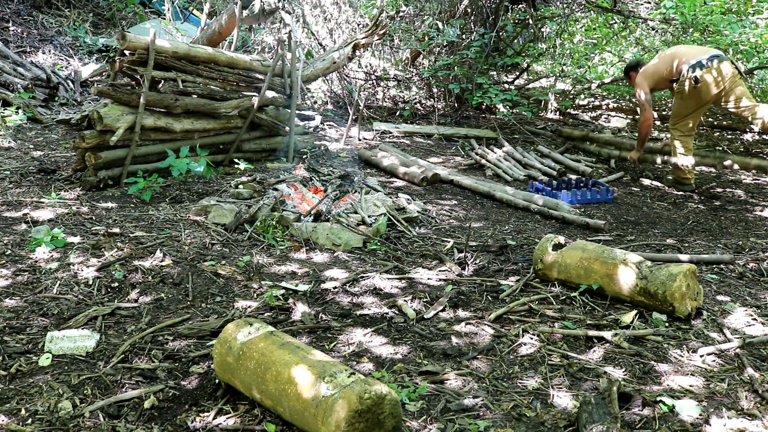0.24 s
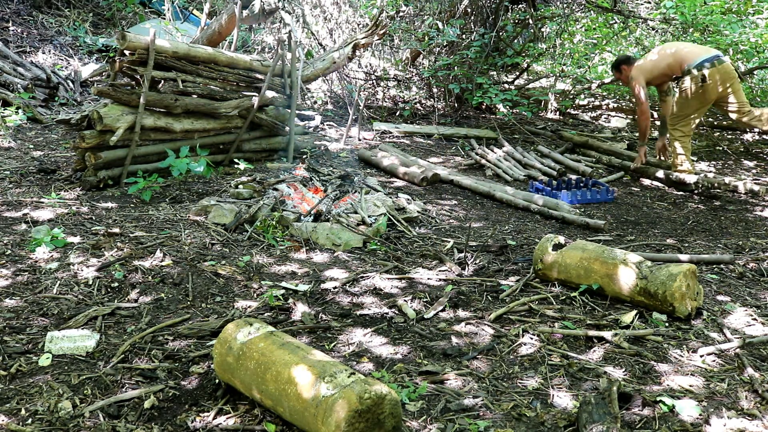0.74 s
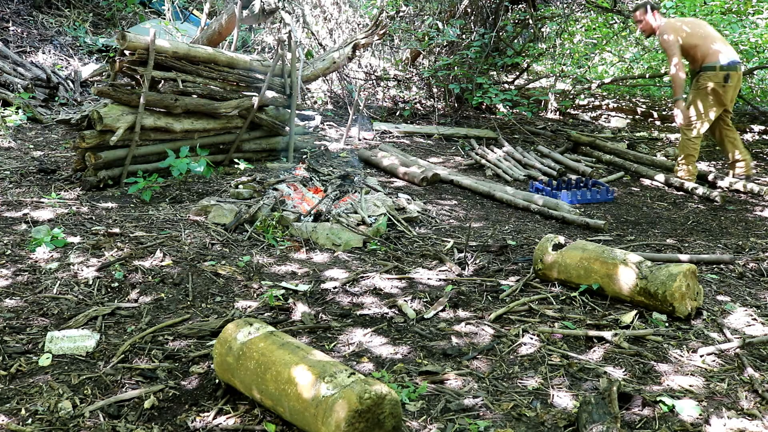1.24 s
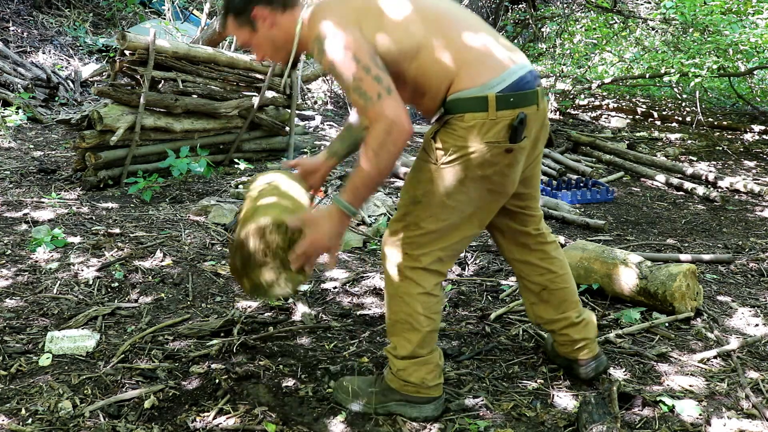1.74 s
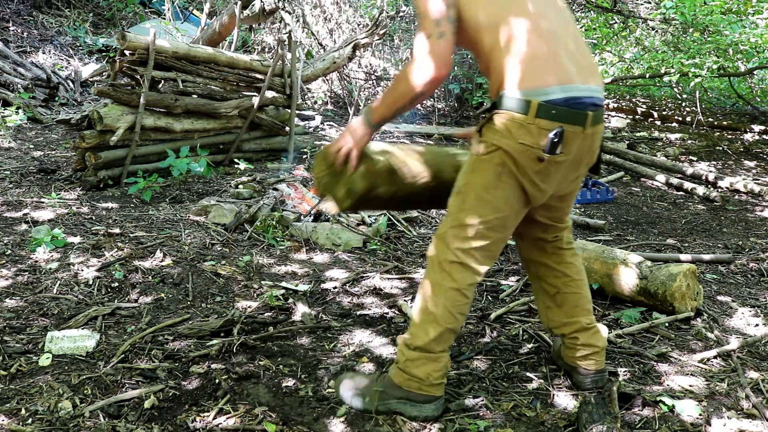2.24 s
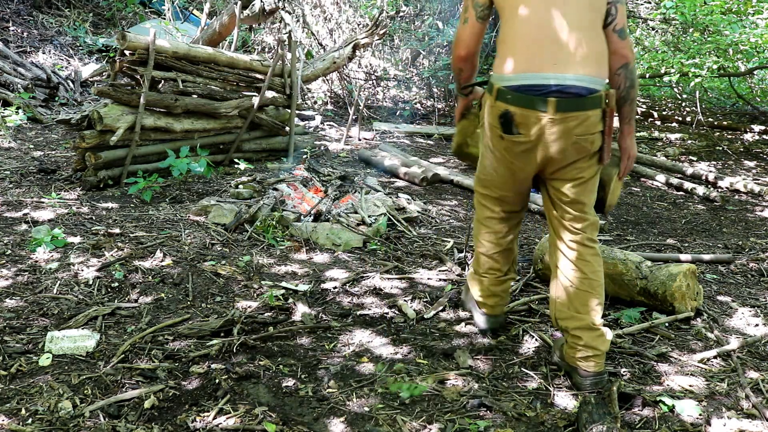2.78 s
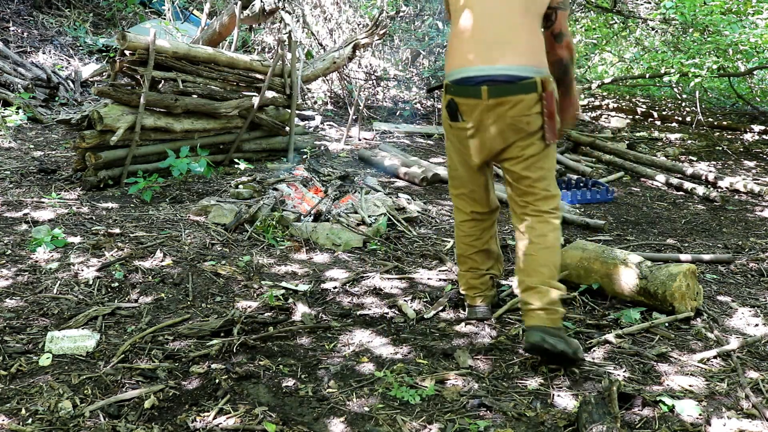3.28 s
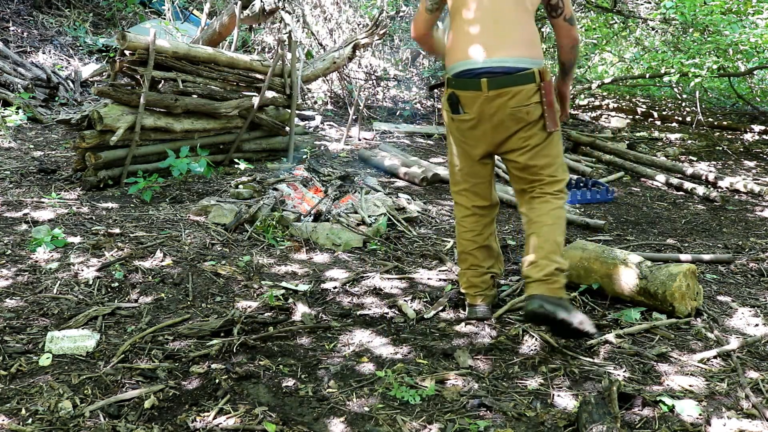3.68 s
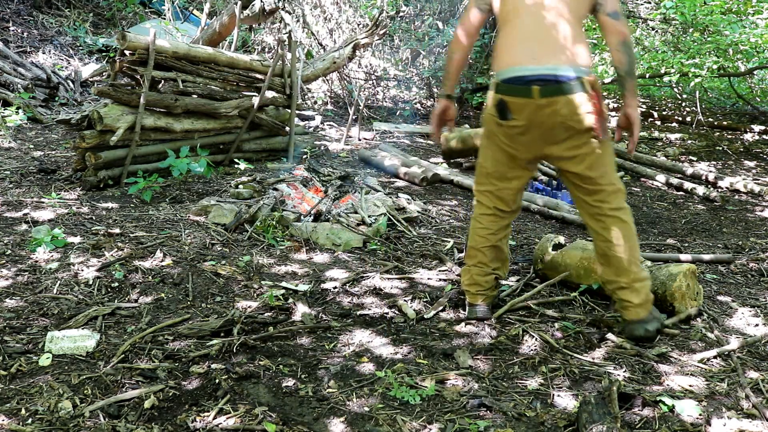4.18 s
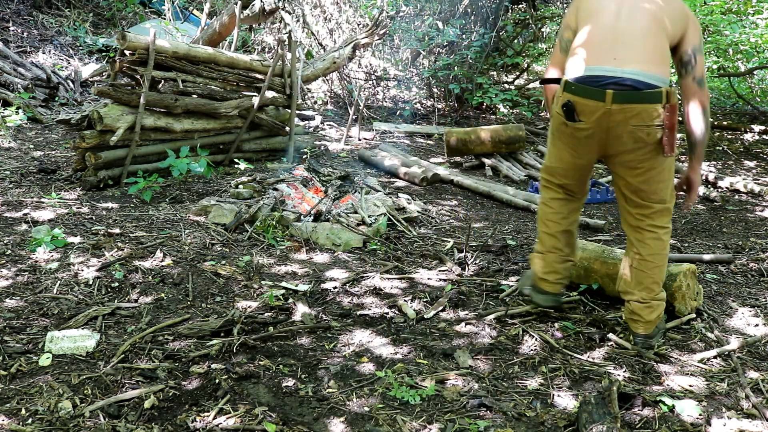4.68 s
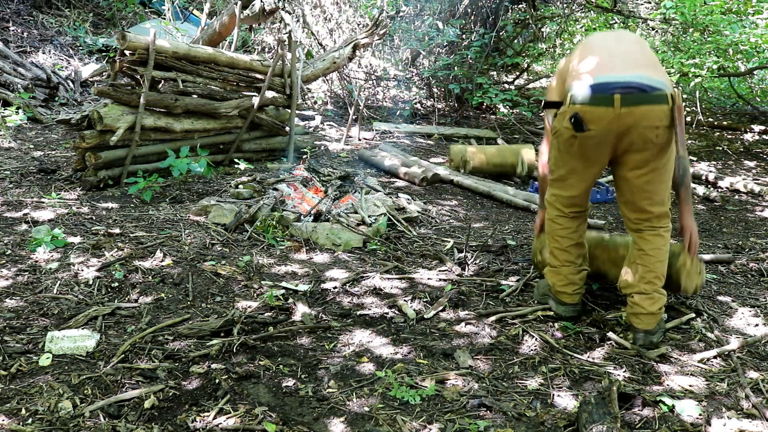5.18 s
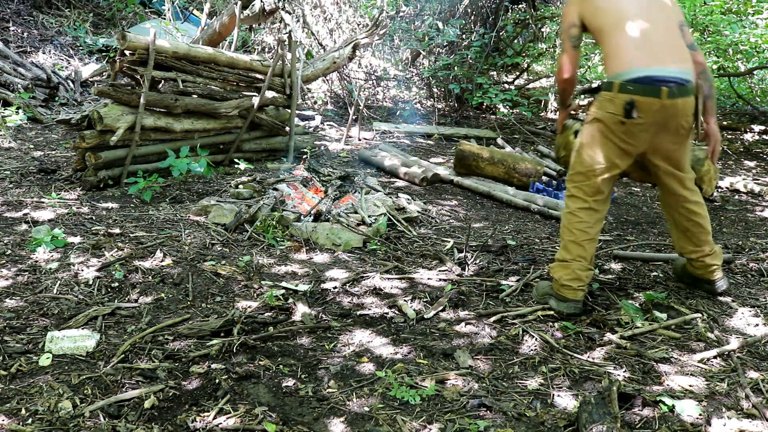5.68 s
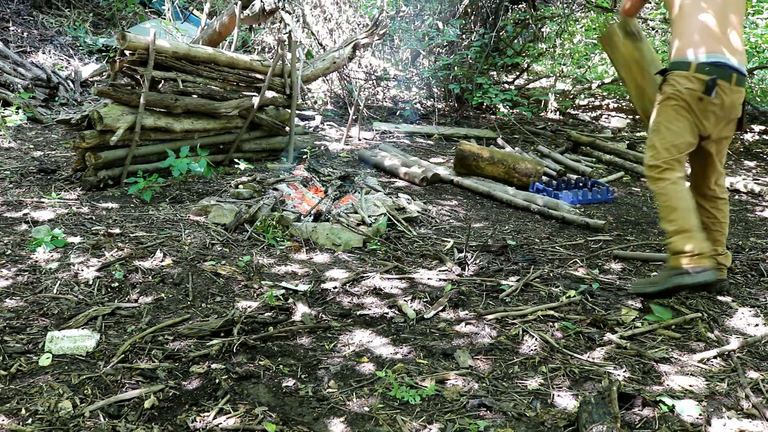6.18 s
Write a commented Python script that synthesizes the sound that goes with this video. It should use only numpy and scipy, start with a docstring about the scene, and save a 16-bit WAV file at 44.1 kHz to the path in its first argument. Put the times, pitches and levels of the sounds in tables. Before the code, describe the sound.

Insects drone in a forest while a pole and then a short log knock down among footsteps and cracking twigs.

```python
"""Summer woodland: two insect choruses hiss throughout, over far traffic, leaves and engine hum.
First, boots scuff the leaf litter, thud on soil and snap twigs. At 1.35 s a pole drops on a wood stack
and rings with hard knocks. More steps follow, then at 4 s a short log lands, rocks and settles as
twigs crack. The recorder turns its gain down briefly after each loud knock. Last, the boots tread on."""
import sys
import numpy as np
from scipy import signal
from scipy.fft import rfft, irfft
from scipy.io import wavfile
from scipy.ndimage import minimum_filter1d

SR = 44100
rng = np.random.default_rng(int(sys.argv[2]) if len(sys.argv) > 2 else 0)


def file_out(sig):
    """Save sig as 16-bit WAV at sys.argv[1]."""
    # one column per channel
    cols = np.atleast_2d(sig).T
    # limit, then scale
    lim = np.clip(cols, -1, 1)
    pcm = np.round(lim * 32767).astype(np.int16)
    wavfile.write(sys.argv[1], SR, pcm)


N = 283512


def knocks(blows, tones, gain_db, bark_db):
    """Each blow rings the wood's own tones and crushes some bark; a soft contact sounds duller."""
    out, t = np.zeros(N), np.arange(SR // 2) / SR
    for start, blow_db, hardness_hz in blows:
        for k, (hz, tone_db, ring_s) in enumerate(tones):
            strength = (-1) ** k / (1 + (hz / hardness_hz) ** 2)   # neighbours swing opposite ways
            fade = from_db(blow_db + tone_db + gain_db - 60 * t / ring_s)
            add(out, start, fade * strength * np.sin(2 * np.pi * hz * t))
        crush = rms_one(band(rng.standard_normal(len(t)), hardness_hz, octaves=2.9))
        add(out, start, from_db(blow_db + bark_db - 60 * t / 0.038) * crush)
    bass_cut = signal.butter(2, 90, "high", fs=SR, output="sos")   # small bodies give no deep bass
    return signal.sosfilt(bass_cut, out)


# Each row: start in seconds, level in dB, hardness of the hit in Hz (higher is brighter).
POLE_BLOWS = [(1.348, -17, 4000), (1.3519, 2.5, 500), (1.3556, 4.5, 1500), (1.3595, -8, 2960),
              (1.363, -6, 1795), (1.369, -25, 800), (1.414, -31, 3000), (1.436, -25, 2500)]
# Each row: pitch of a ringing tone in Hz, level in dB, seconds to fade by 60 dB.
POLE_TONES = [(105, -14.5, 0.054), (165, -13.5, 0.091), (244, -13, 0.024), (366, -5.5, 0.031),
              (494, -0.5, 0.02), (697, -5.5, 0.023), (920, -9, 0.018), (1490, -8.5, .025),
              (1920, -9.5, 0.024), (2370, -7, 0.011), (3060, -10, .012), (4170, -8, .01)]

def pole():
    """A pole lands on the stack and bounces, ringing very briefly."""
    return knocks(POLE_BLOWS, POLE_TONES, gain_db=-2, bark_db=-22)


# Each row: start in seconds, level in dB, hardness of the hit in Hz.
LOG_BLOWS = [(4.020, -17, 4000), (4.023, -10, 700), (4.029, -17, 400), (4.033, -6, 2500), (4.0349, 7, 550),
             (4.038, -7.5, 2500), (4.0412, -7, 700), (4.047, -9, 1500), (4.134, -21, 1500),
             (4.206, -13, 500)]
# Each row: pitch of a ringing tone in Hz, level in dB, seconds to fade by 60 dB.
LOG_TONES = [(172, -8, 0.024), (255.6, -12.5, 0.35), (298, 2.5, 0.02), (463, -15, 0.21), (518, -10.5, 0.18),
             (644, -3.5, 0.024), (762, -7, 0.095), (910, -3, 0.048), (1160, -6.5, 0.12), (1540, -3, 0.026),
             (1900, -6, 0.052), (2370, -7, 0.027), (3250, -7, .015)]

def short_log():
    """A log lands, rocks and settles; a few of its tones ring on."""
    return knocks(LOG_BLOWS, LOG_TONES, gain_db=-5, bark_db=-19)


# Each row: start in seconds, level in dB, middle pitch in Hz, width in octaves.
TWIG_SNAPS = [(0.392, -16.5, 2000, 1.7), (.411, -20.5, 1400, 1.3), (2.274, -18.5, 3220, 1.1),
              (2.397, -15.5, 2020, 3), (2.435, -15, 2220, 3.2), (2.919, -33, 1590, 1.1),
              (3.414, -18.5, 1100, 3.1), (4.181, -18, 3600, 1.5), (4.185, -9, 2590, 4.6),
              (4.206, -20, 1700, 2.2), (4.234, -14, 1600, 2), (4.245, -17, 1500, 2.9),
              (4.259, -17, 3500, 2.3), (4.294, -20, 1860, 1.7), (4.3065, -5, 2800, 1.44),
              (4.321, -10.5, 1700, 1.6), (4.335, -25, 2100, 1.1), (4.355, -18, 1800, 1.1),
              (5.095, -30, 1450, 2.1), (5.142, -24.5, 2400, 1.2)]

def twigs():
    """Twigs break with bright, very short cracks, towards the right."""
    out = np.zeros((2, N))
    for start, level_db, hz, octaves in TWIG_SNAPS:
        add(out, start, burst(level_db, hz, octaves, fade_s=0.016, lean_db=-6.5, spread=0.85))
    return out


# Each row: start in seconds, level in dB, middle pitch in Hz, seconds to fade by 60 dB.
SOIL_THUDS = [(.357, -23.5, 637, 0.054), (.397, -27, 300, 0.052), (.40, -26.5, 85, 0.1),
              (0.463, -32, 267, 0.064), (1.418, -13, 900, 0.019), (1.422, -10, 970, 0.049),
              (2.396, -21.5, 393, 0.035), (2.532, -33, 261, .05), (2.916, -31.5, 300, .04),
              (4.362, -20, 394, 0.074), (4.805, -35, 304, 0.046), (4.855, -27.5, 292, .035),
              (5.047, -21, 338, 0.063), (5.106, -23.5, 846, .075), (5.232, -26.5, 700, .045),
              (5.252, -25.5, 277, 0.044), (5.274, -35, 210, 0.045), (5.372, -26, 260, 0.096),
              (5.779, -26, 263, .05), (6.26, -34, 296, .07)]

def thuds():
    """Boots and wood hit the soil with dull puffs of noise."""
    out = np.zeros((2, N))
    for start, level_db, hz, fade_s in SOIL_THUDS:
        add(out, start, burst(level_db, hz, octaves=1.5, fade_s=fade_s, lean_db=0.7, spread=0.041))
    return out


# Each row: start in seconds, length in seconds, level in dB, middle pitch in Hz, width in octaves.
SCUFF_STROKES = [(.345, 0.12, -42.5, 1290, 3.6), (1.367, 0.078, -29.5, 1020, 3.1),
                 (1.5, 1.1, -54, 1500, 3.7), (2.082, 0.028, -41.5, 1400, 2.5),
                 (1.698, .095, -40.5, 1900, 1.8), (1.706, 0.083, -37.5, 760, .8),
                 (1.808, 0.034, -42.5, 1200, 2.5), (1.873, 0.088, -47.5, 835, 0.46),
                 (1.881, 0.099, -46, 1800, 1.9), (2.396, 0.23, -49.5, 890, 2.8),
                 (3.276, 0.071, -43.5, 875, 1.8), (3.337, 0.07, -47, 504, 0.51),
                 (3.41, 0.061, -47.5, 1580, 1.8), (4.046, 0.24, -33.5, 1140, 2.8),
                 (4.301, 0.051, -29.5, 2370, 1.8), (5.051, 0.12, -38.5, 1500, 4.4),
                 (5.225, 0.032, -39, 1900, 3.6), (5.37, 0.027, -42.5, 1500, 2.2),
                 (5.37, 0.36, -48, 1400, 3.2), (6.175, 0.079, -48, 2300, 1.9),
                 (6.2, 0.035, -36.5, 2200, 3.7), (5.219, 0.27, -50.5, 446, 2), (6.255, 0.042, -47, 1200, 2)]

def scuffs(crumbs_per_s=2500):
    """Boots and bark drag through the litter, where crumbs of leaf and bark crackle."""
    out, t = np.zeros((2, N)), np.arange(SR // 2) / SR
    for start, length, level_db, hz, octaves in SCUFF_STROKES:
        chance, size, direction = rng.random((3, len(t)))
        strength = from_db(-2.5 * np.log(1 - .99 * size))   # many weak crumbs, few strong ones
        crumbs = (chance < crumbs_per_s / SR) * strength * np.sign(direction - .5)
        pair = crumbs + 0.12 * rng.standard_normal((2, len(t)))   # each side adds its own hiss
        crackle = rms_one(band(pair, hz, octaves))
        stroke = np.interp(t / length, [0, .22, .7, 1.15], [0.99, 1, 1, 0.046])
        add(out, start, from_db(level_db) * stroke * crackle * sides(lean_db=-2))
    return out


# Each row: delay of an echo in seconds, level in dB.
ECHOES = [(0.01, -7), (0.02, -18.5), (.037, -20.5), (0.063, -18)]

def echoes(sound):
    """Trunks and ground add a few dull echoes, a little later on the right."""
    dull = signal.lfilter([.3], [1, -.7], sound)
    out = sound.copy()
    for delay, level_db in ECHOES:
        add(out[0], delay, from_db(level_db) * dull[0])
        add(out[1], 1.03 * delay, from_db(level_db) * dull[1])
    return out


# The tone colour of each chorus. Each row: frequency in Hz, relative level in dB.
LOW_CHORUS = [(2600, -31), (3300, -19.5), (3950, -8), (4600, -10), (5400, -7), (6250, -2.5), (6900, -6.5),
              (7350, -2.5), (7850, 0), (8150, -6.5), (8560, -3), (8720, -25.5), (9000, -24)]
HIGH_CHORUS = [(8600, -2.5), (9400, -8), (11300, -5), (12200, -2.5), (14000, -3.5), (14900, -12),
               (16000, -6)]
# Near singers throb. Each row: pulses per second, typical depth as a share of the level.
LOW_THROBS = [(68.5, 0.023), (83, 0.026), (152, 0.032)]
HIGH_THROBS = [(54, 0.066), (61, 0.073)]
# Each row: time in seconds, low chorus level in dB, high chorus level in dB.
CHORUS_LEVELS = [(0.0, -26.5, -36), (2.86, -25.5, -35.5), (6.43, -25.5, -36)]

def insects():
    """Two choruses sing steadily, one higher than the other."""
    low_db, high_db = in_time(CHORUS_LEVELS)
    low = chorus(LOW_CHORUS, low_db, LOW_THROBS, flicker_db=0.6)
    high = chorus(HIGH_CHORUS, high_db, HIGH_THROBS, flicker_db=0.67)
    return low + high


def chorus(spectrum, level_db, throbs, flicker_db):
    """Thousands of insect clicks blur to hiss; near singers leave throbs that come and go."""
    t = np.arange(N) / SR
    beat = 1
    for rate, depth in throbs:
        wander = np.cumsum(0.0404 * drift(3.7)) / SR   # the pulse rate wavers a little
        swell = from_db(2.75 * drift(0.78))
        beat = beat + depth * swell * np.sin(2 * np.pi * rate * (t + wander))
    return from_db(level_db + flicker_db * drift(7.2)) * beat * stereo_noise(spectrum)


# The tone colour of traffic and leaves. Each row: frequency in Hz, relative level in dB.
AIR_COLOUR = [(15, -39), (25, -12), (60, -4), (101, -1.5), (200, -6.5), (350, -16), (480, -14.5),
              (600, -16.5), (1180, -22), (2000, -21.5), (3200, -20.5), (4200, -53)]

def traffic_and_leaves(level_db=-44):
    """Far traffic and leaves blend into a soft, wavering rumble and hiss."""
    return from_db(level_db + 0.97 * drift(9)) * stereo_noise(AIR_COLOUR)


# A hum near 160 Hz gives way to a lower hum near 94 Hz. Each row: time in seconds, pitch in Hz, level in dB.
NEAR_HUM = [(0, 155, -52.5), (.6, 158.5, -48.5), (1.1, 164, -40.5), (1.33, 168, -54)]
FAR_HUM = [(1.5, 91, -49.5), (2.2, 92, -47), (2.8, 94, -46), (3.6, 94, -43.5), (4.3, 95, -47),
           (5.2, 95, -49.5), (6.43, 95, -51)]

def engine_hum(rows, waver_db):
    """An engine hums one tone, fading in at its first row and out at its last."""
    hz, level_db = in_time(rows)
    t = np.arange(N) / SR
    start, end = rows[0][0] - 0.073, rows[-1][0] + 0.043
    fade = np.clip(np.minimum(t - start, end - t) / 0.054, 0, 1)
    tone = np.sqrt(2) * np.sin(2 * np.pi * np.cumsum(hz) / SR)
    return fade * from_db(level_db + waver_db * drift(14)) * tone


# Each row: frequency in Hz, how alike left and right are (1 is the same, 0 is unrelated).
LIKENESS = [(60, .99), (150, 0.96), (330, 0.77), (770, 0.43), (1200, -0.016), (2800, -0.064),
            (4200, -0.051), (4700, 1), (6400, 0.93), (9800, 0.93), (13000, 0.98)]
# Each row: frequency in Hz, how much louder the left is in dB.
LEAN = [(60, 0), (500, 0.5), (1200, -1.2), (2800, -1.5), (6400, -0.5), (15000, -0.8)]

def stereo_noise(spectrum):
    """Background noise of a given tone colour, spread between left and right."""
    hz = np.maximum(np.arange(N // 2 + 1) * SR / N, 1)
    mid, side = rfft(rng.standard_normal((2, N)))
    alike = np.clip(at_hz(LIKENESS, hz), -1, 1)
    pair = np.sqrt(1 + alike) * mid + np.sqrt(1 - alike) * side * [[1], [-1]]
    inside = (hz >= spectrum[0][0]) & (hz <= spectrum[-1][0])
    colour = from_db(at_hz(spectrum, hz)) * inside
    return rms_one(irfft(pair * sides(at_hz(LEAN, hz)) * colour, N))


def burst(level_db, hz, octaves, fade_s, lean_db, spread):
    """A short, dying noise; more spread makes left and right less alike."""
    t = np.arange(SR // 5) / SR
    shared, *each_side = rng.standard_normal((3, len(t)))
    shape = from_db(-60 * t / fade_s) * np.minimum(t / (0.043 * fade_s), 1)   # long ones start softly
    puff = band((shared + spread * np.array(each_side)) * shape, hz, octaves)
    gain = 0.67 * from_db(level_db) * np.sqrt(np.mean(shape ** 2))
    return gain * rms_one(puff) * sides(lean_db)


def from_db(db):
    """Turn decibels into a multiplier."""
    return 10 ** (np.asarray(db) / 20)


def rms_one(x):
    """Scale to an average strength (rms) of 1."""
    return x / np.sqrt(np.mean(x ** 2) + 1e-20)


def in_time(rows):
    """Join timed rows into curves, one value per sample."""
    times, *columns = np.transpose(rows)
    return [np.interp(np.arange(N) / SR, times, column) for column in columns]


def at_hz(rows, hz):
    """Read between the rows of a frequency table, with octaves evenly spaced."""
    row_hz, values = np.transpose(rows)
    return np.interp(np.log(hz), np.log(row_hz), values)


def drift(rate_hz):
    """A slow random wobble, about 1 in size."""
    step = 40   # samples per random value
    keep = np.exp(-2 * np.pi * step * rate_hz / SR)
    noise = rng.standard_normal(N // step + 2002)
    slow = signal.lfilter([1], [1, -2 * keep, keep * keep], noise)[2000:]
    return np.interp(np.arange(N) / step, np.arange(len(slow)), rms_one(slow - slow.mean()))


def sides(lean_db):
    """Left and right gains; a positive lean favours the left."""
    return from_db(np.array([[.5], [-.5]]) * lean_db)


def band(x, hz, octaves):
    """Keep only the frequencies around hz."""
    edges = np.clip(hz * 2 ** (np.array([-.5, .5]) * octaves), 20, 19000)
    return signal.sosfilt(signal.butter(2, edges, "band", fs=SR, output="sos"), x)


def add(out, start, sound):
    """Mix a sound in at a start time in seconds."""
    i = round(start * SR)
    out[..., i:i + sound.shape[-1]] += sound[..., :N - i]


def scene():
    """Wood and boots echo in the clearing, with insects and far rumble around."""
    near = pole() + short_log() + twigs() + thuds() + scuffs()
    woodland = echoes(near) + insects() + traffic_and_leaves()
    return woodland + engine_hum(NEAR_HUM, waver_db=-1) + engine_hum(FAR_HUM, waver_db=0.5)


def record(dry):
    """Loud peaks pull the recorder's gain down; it holds, then comes back. Overload clips."""
    threshold_db, hold_s, release_db_per_s, attack_s = -6, .03, 110, .009
    over_db = np.maximum(20 * np.log10(np.abs(dry).max(axis=0) + 1e-9) - threshold_db, 0)
    hold = round(hold_s * SR)
    held_db = -minimum_filter1d(-over_db, hold, origin=(hold - 1) // 2)   # largest recent excess
    ramp = release_db_per_s * np.arange(N) / SR
    cut_db = np.maximum.accumulate(held_db + ramp) - ramp
    keep = np.exp(-1 / (attack_s * SR))
    smooth_cut_db = signal.lfilter([1 - keep], [1, -keep], cut_db)
    clipped = np.clip(dry * from_db(-smooth_cut_db), -1, 1)
    treble_cut = signal.ellip(12, .5, 70, 15680, fs=SR, output="sos")   # steep, above 15680 Hz
    return signal.sosfilt(treble_cut, clipped)


dry = scene()
out = record(dry)
file_out(out)
```